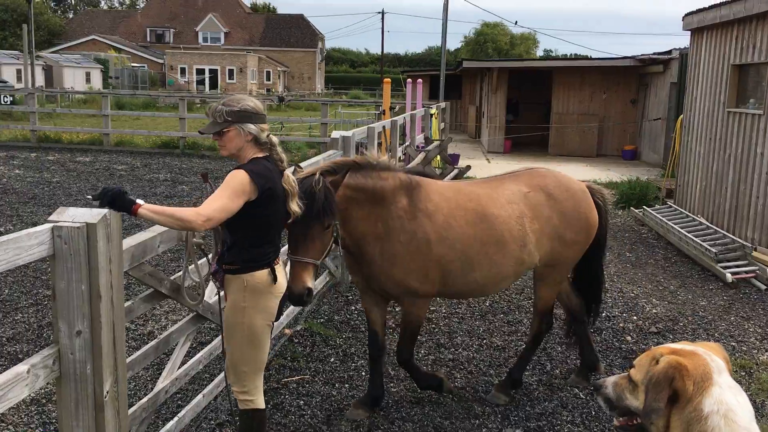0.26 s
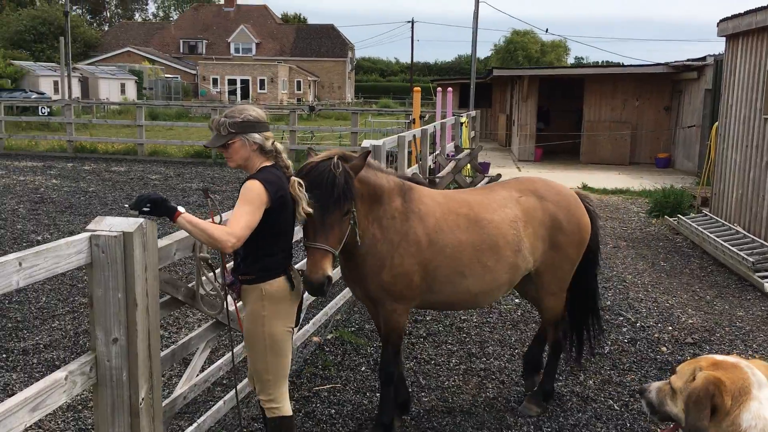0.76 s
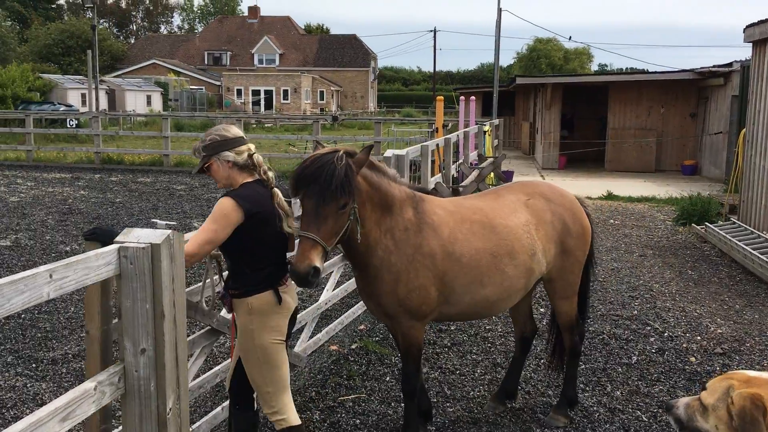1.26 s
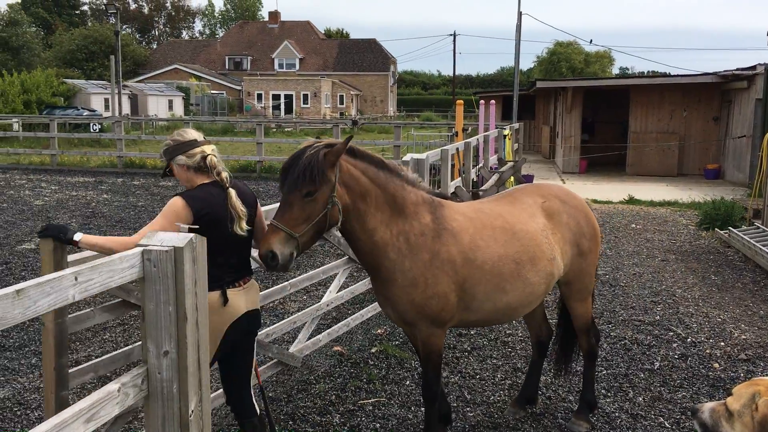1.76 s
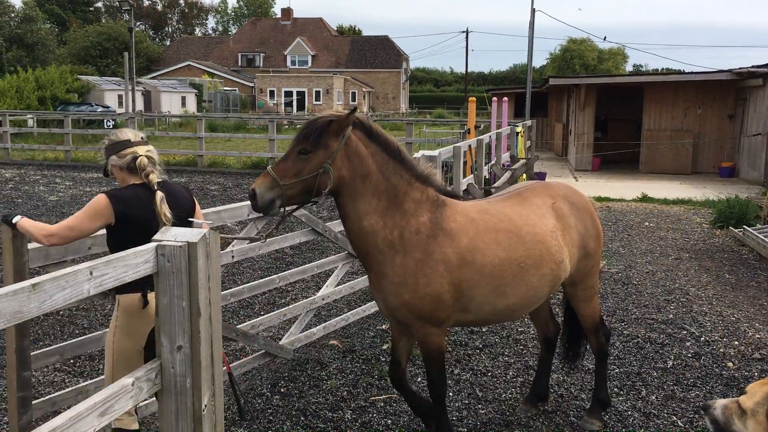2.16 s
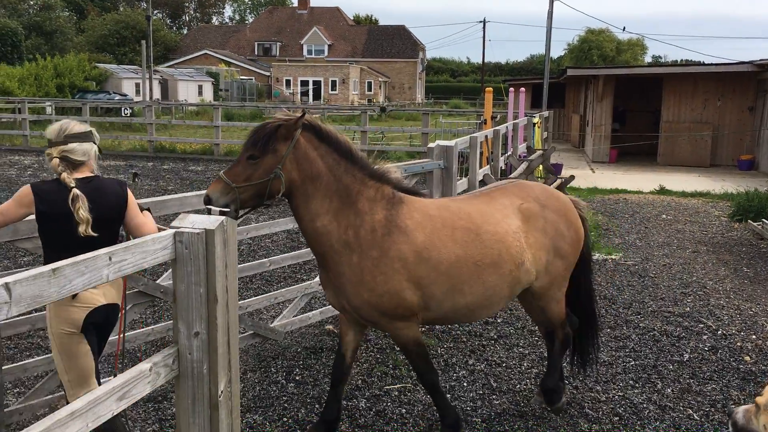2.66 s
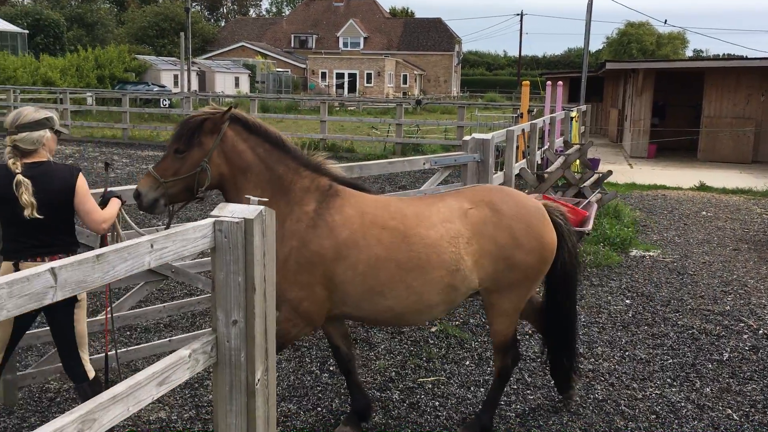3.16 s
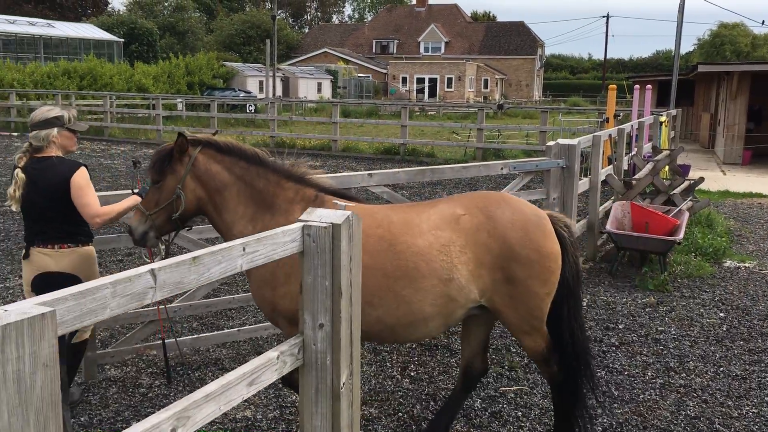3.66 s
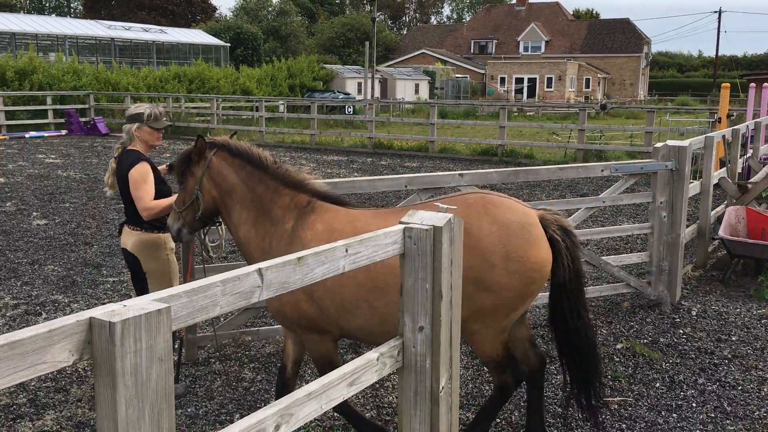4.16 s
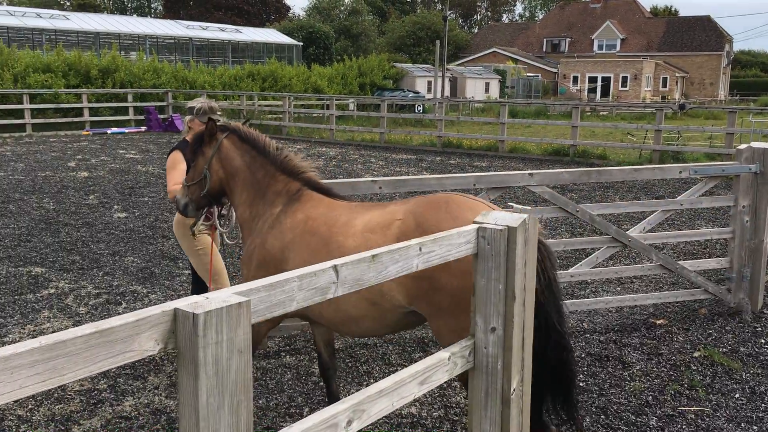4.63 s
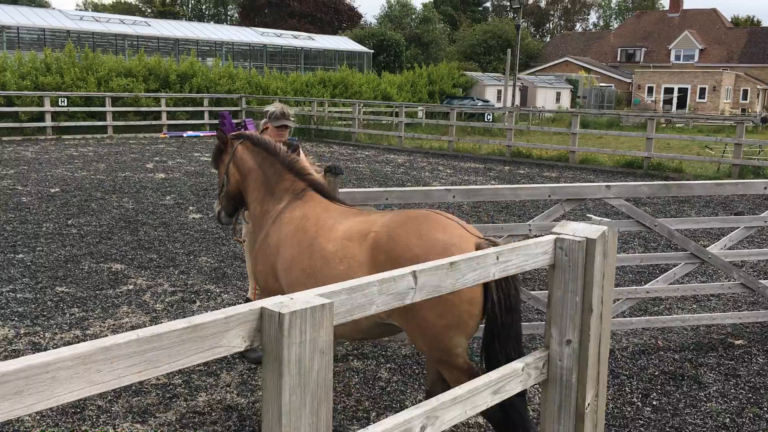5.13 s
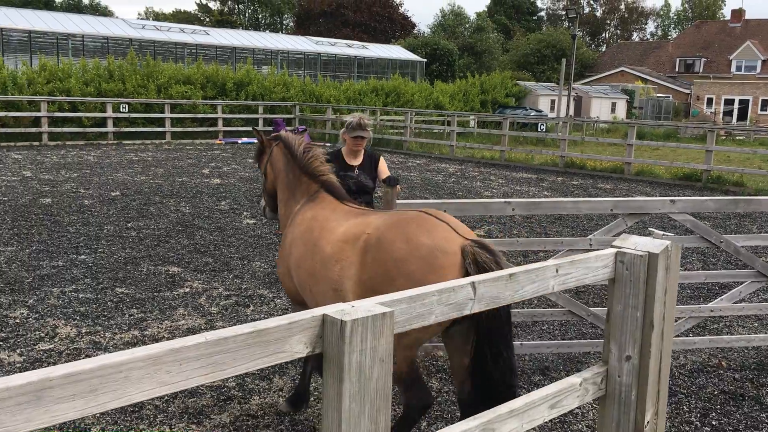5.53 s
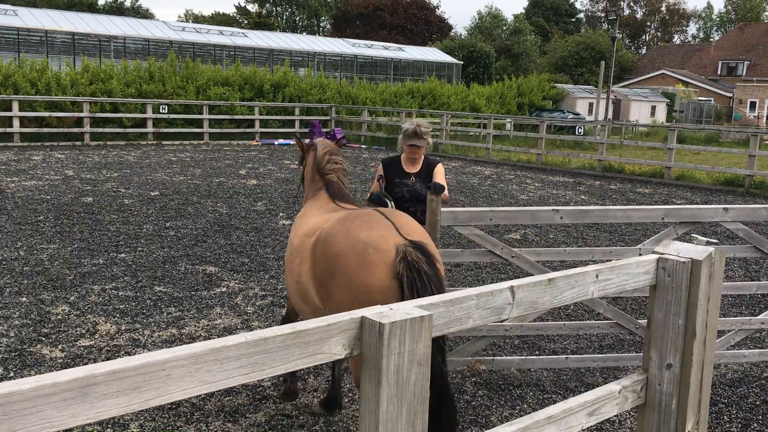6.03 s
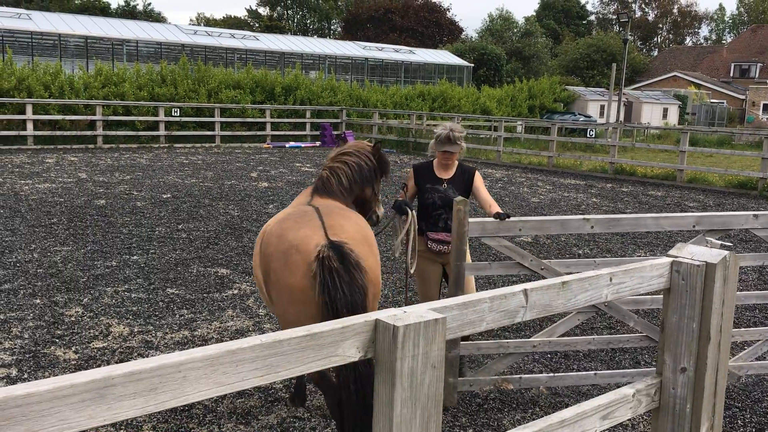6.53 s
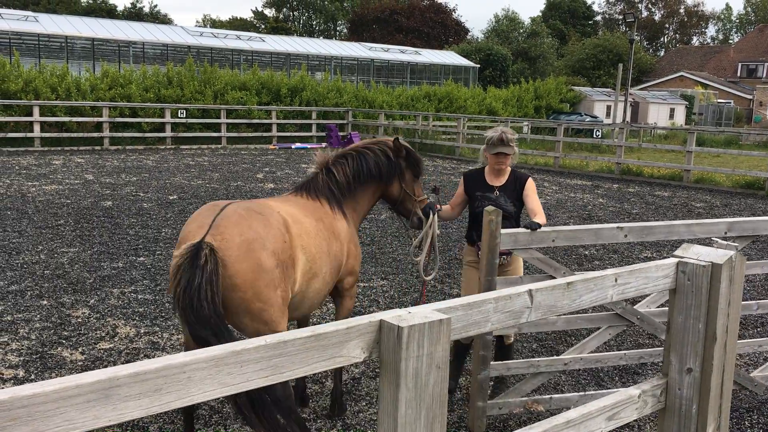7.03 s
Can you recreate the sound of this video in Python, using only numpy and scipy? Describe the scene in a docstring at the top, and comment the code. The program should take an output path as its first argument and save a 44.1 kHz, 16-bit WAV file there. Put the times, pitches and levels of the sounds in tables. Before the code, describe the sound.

A gate bolt squeals and clacks open, hooves crunch over gravel, then a horse whinnies high and drops to a low nicker outdoors.

```python
"""Over open-air hiss and a low rumble, a steel bolt knocks on a timber gate, squeals and clacks free.
A horse is led over gravel into an outdoor arena: stones crunch and snap, hooves clop, far birds call.
At 4 s it whinnies with two voices at once: a thin rising whistle over a low tone turns hoarse and
shakes. The call drops to a groan, then to a fluttering nicker with puffs through the nostrils.
A few more bird notes and faint steps close the scene."""
import sys
import numpy as np
from scipy import signal
from scipy.fft import rfft, irfft
from scipy.io import wavfile
from scipy.ndimage import uniform_filter1d

SR = 44100
rng = np.random.default_rng(int(sys.argv[2]) if len(sys.argv) > 2 else 0)


def store_wav(level_fs):
    """Save 16-bit WAV to argv[1]."""
    pcm = np.round(np.clip(np.atleast_2d(level_fs), -1, 1) * 32767)
    wavfile.write(sys.argv[1], SR, pcm.T.astype(np.int16))


N = 321489
TIME = np.arange(N) / SR
HIT_TIME = np.arange(SR // 2) / SR  # time axis of a one-shot

# tone of the open-air hiss: (frequency [Hz], gain [dB])
AIR_EQ = [(20, -24), (49, 5.5), (81, 1), (317, -15.5), (482, -24), (570, -20.5), (996, -22.5),
          (2060, -30.5), (3500, -30), (5100, -35.5), (10400, -35), (13400, -31.5), (15800, -38)]
# bands of far rumble: (frequency [Hz], width [Hz], rms level [dB])
RUMBLE_BANDS = [(74.94, 10, -59.5), (157, 70, -69)]
# hits of the bolt: (time [s], gate knock level [dB], steel level [dB], t60 [s])
BOLT_HITS = [(.242, -30, -35.5, 0.039), (.347, -44.5, -34, 0.18), (0.366, -38, -27, 0.042),
             (0.3849, -33.5, -26, 0.012), (0.3917, -16.5, -23, 0.036), (0.878, -45, -48.5, 0.11),
             (0.9436, -27, -26.5, 0.13), (0.966, -30, -30, 0.07), (0.977, -30.5, -39.5, 0.051),
             (1.046, -79, -50, 0.39)]
# short ring of the gate's timber: (frequency [Hz], gain [dB], t60 [s])
TIMBER_MODES = [(1010, -1, 0.043), (1199, 1.5, 0.034), (1434, -2.5, 0.037), (1570, -15.5, 0.074),
                (3038, -6, 0.025)]
# body of the gate: (frequency [Hz], gain [dB])
KNOCK_EQ = [(150, -26), (430, -26.5), (620, -11), (760, -9.5), (1050, -3), (1250, -6.5), (1550, -3),
            (1850, -17.5), (2350, -10), (2650, -19.5), (3000, -13), (4300, -26.5), (13000, -41.5)]
# bright steel contact: (frequency [Hz], gain [dB])
CLACK_EQ = [(1060, -31.5), (1800, -3), (4120, -2), (5000, -7.5), (5710, 1), (13700, -11.5), (15800, -3)]
# ring of bolt and gate: (frequency [Hz], gain [dB], t60 [s])
STEEL_MODES = [(1184, -20, 0.25), (2350, -18.5, 0.099), (3000, -18.5, 0.1), (4048, -23.5, 0.19),
               (5720, -5, 0.091), (5500, -21.5, 0.2), (6840, -19, 0.28), (8540, -14, 0.15), (9200, -19, .2),
               (10415, -17, 0.17), (11180, -16.5, 0.21), (12000, -9, 0.14), (13264, -10, 0.17),
               (13980, -15, .1)]
# squeaks of the sliding bolt: (time [s], length [s], level [dB])
BOLT_SQUEAKS = [(0.34, 0.025, -14.5), (0.357, 0.024, -14.5), (0.375, 0.025, -26), (0.443, 0.01, -32.5),
                (0.446, 0.041, -38.5)]
# tones that join the squeal under hard rubbing: (frequency [Hz], gain at full force [dB])
SQUEAL_SIDE_TONES = [(6870, -16), (11980, -19.5), (14300, -22)]
# the bolt sings on after the squeal: (frequency [Hz], level [dB], t60 [s])
SQUEAL_TAIL = [(7000, -55, 0.63), (13200, -41, .5)]
# the bolt scrapes in its keeper: (time [s], attack [s], level [dB])
BOLT_SCRAPES = [(0.591, 0.046, -46), (0.847, 0.0021, -51)]
# hooves and boots on gravel: (time [s], level [dB], extra grit [dB])
FOOTSTEPS = [(.63, -83, 6), (1.27, -69, 2), (2.64, -65.5, 0), (2.98, -66, 0), (3.12, -72, 5),
             (3.76, -64.5, 0.5), (6.85, -72, 1), (7.062, -66, 2)]
# body of the gravel: (frequency [Hz], gain [dB])
CRUNCH_EQ = [(180, -25.5), (300, 2.5), (370, -5), (1010, -1), (1330, -1.5), (2190, -0.5), (7000, -12.5),
             (9100, -38), (15400, -120)]
# top end of the gravel: (frequency [Hz], gain [dB])
GRIT_EQ = [(2350, -51), (4000, -13.5), (7840, -10.5), (11700, -6), (15800, -7)]
# soft thud of the ground: (frequency [Hz], width [Hz], gain [dB])
GROUND_MODES = [(203, 77, 0)]
# single stones snapping underfoot: (time [s], snap level [dB], body level [dB])
STONE_SNAPS = [(0.74, -31, -59), (0.7651, -27.5, -56), (0.781, -33, -62), (1.288, -43, -55.5),
               (1.434, -29.5, -61), (1.476, -35, -50),  (3.04, -39, -54), (3.062, -29, -66),
               (3.302, -34, -61), (3.478, -39, -70), (3.818, -48, -51.5), (3.959, -40, -50.5),
               (4.052, -39, -61), (6.592, -46, -54.5), (6.662, -40.5, -54.5)]
# hooves on larger stones: (time [s], pitch [Hz], level [dB])
HOOF_CLOPS = [(1.355, 1080, -48), (2.736, 1930, -43), (2.944, 2410, -49.5), (3.315, 1010, -47),
              (3.818, 916, -45), (5.766, 990, -47), (5.967, 1400, -44.5), (6.095, 1890, -53)]
# bird notes: (time [s], length [s], mid pitch [Hz], glide [Hz], arch [Hz], level [dB], scratch [x])
BIRD_NOTES = [(2.407, 0.037, 1447, 69, -1, -65, 0.25), (2.449, 0.031, 2050, -750, 44, -63, 0.34),
              (3.466, 0.135, 3090, 52, 424, -66.5, 0.44), (5.518, 0.067, 3853, 394, 0, -59.5, .5),
              (5.786, 0.048, 4390, -200, 66, -64.5, 0.34), (6.317, 0.093, 4440, 24, 6, -66.5, 0.25),
              (6.427, 0.072, 4520, 17, 7, -69.5, 0.34), (6.488, 0.041, 6350, -100, -700, -65, 0.25),
              (6.593, 0.036, 6400, 205, -450, -70, 0.24), (6.734, 0.068, 5640, -30, -1, -71, 0.17),
              (6.766, 0.19, 3710, 489, -60, -66, 0.89), (6.849, 0.21, 3830, 148.5, 9, -67.5, 3.6)]
# automation of the whinny: (time [s], whistle pitch [Hz], whistle level [dB], breath level [dB])
WHINNY_CURVES = [(4, 1380, -62, -51.5), (4.069, 1560, -47.5, -57.5), (4.225, 1673, -34.5, -54.5),
                 (4.259, 1783, -42.5, -55), (4.395, 1847, -36.5, -39), (4.426, 1955, -33.5, -41.5),
                 (4.474, 1917, -37, -38.5), (4.51, 1952, -30.5, -39), (4.59, 2048, -33, -39),
                 (4.734, 2002, -36, -39), (4.809, 1971, -45.5, -39.5), (4.929, 1979, -37.5, -41.5),
                 (4.985, 1913, -41.5, -45.5), (5.031, 1950, -36.5, -45), (5.09, 1898, -43.5, -44.5),
                 (5.22, 1856, -47.5, -46), (5.345, 1908, -52, -50), (5.4, 1930, -66, -50),
                 (5.561, 1800, -71, -61)]
# resonances that lift the whistle's octave: (frequency [Hz], width [Hz], gain [dB])
OCTAVE_FORMANTS = [(3122, 82, 9.5), (3570, 460, 1.5), (3818, 150, 2)]
# highest resonances of the open mouth: (frequency [Hz], width [Hz], gain [dB])
MOUTH_FORMANTS = [(5350, 500, -3), (6480, 480, -8), (7560, 500, -8), (8520, 270, -5), (9380, 850, -6.5),
                  (11600, 1500, -12), (13600, 2400, -18)]
# lower resonances of throat and nose: (frequency [Hz], width [Hz], gain [dB])
LOW_FORMANTS = [(610, 250, -4), (1123, 96, 6.5), (1407, 223, 5.5), (1787, 340, 5.5), (2153, 490, 5)]
# upper resonances of throat and nose: (frequency [Hz], width [Hz], gain [dB])
RASP_FORMANTS = [(2830, 380, 4), (3256, 160, 13), (3450, 180, 9.5), (3752, 140, 12.5), (4290, 170, 5.5),
                 (4650, 150, -1.5)]
# automation of the groan: (time [s], pitch [Hz], tone level [dB], rasp level [dB])
GROAN_CURVES = [(5.262, 215.7, -56, -60), (5.28, 204.3, -34, -48), (5.328, 279.2, -42, -38),
                (5.356, 225, -37.5, -42.5), (5.39, 176.7, -37, -52.5), (5.425, 166, -30.5, -58),
                (5.475, 158.4, -40, -60), (5.51, 154.3, -36, -60), (5.54, 127, -52, -73)]
# the throat during the groan: (frequency [Hz], width [Hz], gain [dB])
GROAN_FORMANTS = [(497, 270, -2.5), (1368, 145, 6.5), (1626, 110, 6.5), (1920, 120, 5.5), (2130, 130, 4),
                  (3290, 280, -0.5)]
# flutters of the nicker: (time [s], level [dB], pitch [Hz], length [s])
NICKER_FLUTTERS = [(5.538, -44.5, 100, 0.081), (5.609, -35, 64, 0.0412), (5.705, -39, 65.5, 0.041),
                   (5.826, -44.5, 134, 0.041), (5.892, -36, 158, 0.0068), (5.893, -34, 61.6, 0.047),
                   (5.949, -42, 79.3, 0.055), (6.013, -45, 68, 0.07)]
# puffs through the nostrils: (time [s], attack [s], level [dB])
NOSTRIL_PUFFS = [(5.54, 0.08, -68.5), (5.812, 0.042, -59.5), (5.893, 0.034, -60), (6.051, 0.11, -76)]
# nostril resonances: (frequency [Hz], width [Hz], gain [dB])
NOSTRIL_FORMANTS = [(1500, 450, 2), (1990, 210, 0.5), (3335, 220, 5), (3910, 490, -7.5), (5700, 770, -11.5)]
# reverb decay of the yard: (frequency [Hz], t60 [s])
YARD_DECAY = [(150, 0.21), (1000, 0.42), (4000, 0.36), (14000, 0.14)]

HIT_ATTACK_S = 0.0031
WHINNY_S, GROAN_S = WHINNY_CURVES[0][0], GROAN_CURVES[0][0]
HISS_DULL_DB = -3  # the closing mouth takes this off the top end


def amp(db):
    """Decibels to gain."""
    return 10 ** (np.asarray(db) / 20)


def unit(x):
    """Scales to an rms of 1."""
    return x / np.sqrt(np.mean(x ** 2) + 1e-20)


def ramp(start, length):
    """Fades from 0 at start to 1 at start + length; a negative length runs back in time."""
    return np.clip((TIME - start) / length, 0, 1)


def decay(t60):
    """One-shot envelope that falls 60 dB in t60 seconds."""
    return amp(-60 * HIT_TIME / t60)


def value_at(points, hz):
    """Reads a curve on a log-frequency axis."""
    f, value = np.transpose(points)
    return np.interp(np.log(hz + 1), np.log(f + 1), value)


def curves(rows):
    """Turns timed breakpoints into one automation curve per column."""
    times, *columns = np.transpose(rows)
    return [np.interp(TIME, times, column) for column in columns]


def during(rows):
    """1 while a table lasts, with soft ends."""
    return uniform_filter1d(1. * (TIME >= rows[0][0]) * (TIME <= rows[-1][0]), size=600)


def add(mix, s, sound):
    """Mixes a sound in at time s."""
    part = mix[max(round(s * SR), 0):][:len(sound)]
    part += sound[:len(part)]


def phase_of(hz):
    """Running phase of a pitch curve."""
    return 2 * np.pi * np.cumsum(hz) / SR


def wander(hz):
    """Smooth random modulation of rms 1, up to the given rate."""
    f = np.fft.rfftfreq(N, 1 / SR)
    return unit(irfft(rfft(rng.standard_normal(N)) / (1 + (f / hz) ** 4), N))


def colour(x, eq):
    """Minimum-phase EQ."""
    hz = abs(np.fft.fftfreq(2048, 1 / SR))
    log_gain = np.log(amp(np.maximum(value_at(eq, hz), -100)))
    taps = np.fft.ifft(np.exp(np.conj(signal.hilbert(log_gain)))).real
    return signal.oaconvolve(x, taps)[:len(x)]


def resonate(x, modes, shift=1):
    """Parallel resonances, each applied twice for dark valleys; shift scales their pitch."""
    out, clock = np.zeros(N), phase_of(shift * np.ones(N))
    for hz, width, db in modes:
        pole, carrier = np.exp(-np.pi * width / SR), np.exp(1j * hz * clock)
        band = signal.lfilter([(1 - pole) ** 2], np.poly([pole, pole]), x * carrier.conj() + 1e-18)
        out += amp(db) * (carrier * band).real
    return out


def ringing(modes):
    """A struck object: each mode starts at a random phase and dies away."""
    sound = sum(amp(db) * decay(t60) * np.sin(2 * np.pi * (hz * HIT_TIME + rng.random()))
                for hz, db, t60 in modes)
    return sound * np.minimum(HIT_TIME / .0005, 1)


def burst(attack, t60, eq):
    """A rattling contact: coloured noise that swells to rms 1 and dies."""
    shape = np.minimum(HIT_TIME / attack, 1) * amp(-60 * np.maximum(HIT_TIME - attack, 0) / t60)
    sound = colour(rng.standard_normal(len(shape)) * shape, eq)
    return unit(sound) * np.sqrt(np.mean(shape ** 2))


def outdoors(hiss_db=-57):
    """The bed: soft, drifting open-air hiss over a distant rumble."""
    air_gain = amp(value_at(AIR_EQ, np.fft.rfftfreq(N, 1 / SR)))
    hiss = unit(irfft(rfft(rng.standard_normal(N)) * air_gain, N))
    rumble = sum(amp(db) * unit(resonate(rng.standard_normal(N), [(hz, width, 0)]))
                 for hz, width, db in RUMBLE_BANDS)
    return hiss * amp(hiss_db + 1.1 * wander(1)) + rumble


def timber_knock(peak_db=2):
    """The struck timber of the gate rings briefly."""
    knock = sum(amp(db) * decay(t60) * np.sin(2 * np.pi * hz * HIT_TIME) for hz, db, t60 in TIMBER_MODES)
    knock *= np.minimum(HIT_TIME / HIT_ATTACK_S, 1)
    return knock * amp(peak_db) / abs(knock).max()


def bolt_hits(crack_db=-3, clack_db=-4, rattle_db=-37, held_db=-13.5):
    """The bolt knocks on the timber, clacks, sets the steel ringing and rattles the loose gate."""
    hits, ring, rattle = np.zeros((3, N))
    timber = timber_knock()
    for s, knock_db, steel_db, t60 in BOLT_HITS:
        add(hits, s, amp(knock_db) * (timber + amp(crack_db) * burst(HIT_ATTACK_S, t60, KNOCK_EQ)))
        add(hits, s, amp(steel_db + clack_db) * burst(HIT_ATTACK_S, t60, CLACK_EQ))
        add(ring, s, amp(steel_db) * ringing(STEEL_MODES))
        shiver = sum(burst(attack=0.023, t60=0.51, eq=eq) for eq in (CLACK_EQ, KNOCK_EQ))
        add(rattle, s, amp(knock_db + rattle_db) * shiver)
    rattle *= amp(6.5 * wander(64))  # the gate shivers in fits
    ring *= amp(held_db * (1 - ramp(0.82, 0.14)))  # the keeper damps the steel until the bolt is free
    ring *= amp(4.5 * wander(110))  # loose parts touch and unsettle the ring
    return hits + ring + rattle


def bolt_squeal(pitch_hz=13270, waver=0.0027, side_waver=0.019):
    """Sliding steel squeals, gains side tones as it rubs harder, and sings on afterwards."""
    rub = np.zeros(N)
    for s, length, db in BOLT_SQUEAKS:
        add(rub, s, amp(db) * np.sin(np.linspace(0, np.pi, int(length * SR))))
    slip = phase_of(1 + waver * wander(180))
    judder = phase_of(1 + side_waver * wander(376))
    sides = sum(amp(db) * np.sin(hz * judder) for hz, db in SQUEAL_SIDE_TONES)
    squeal = rub * (np.sin(pitch_hz * slip) + rub / rub.max() * sides)
    for hz, db, t60 in SQUEAL_TAIL:
        phase = 2 * np.pi * hz * HIT_TIME + wander(40)[:len(HIT_TIME)]
        add(squeal, BOLT_SQUEAKS[1][0], amp(db) * decay(t60) * np.sin(phase))
    return squeal


def bolt_scrapes(t60=0.053, steel_db=-11):
    """The bolt grinds in its keeper and shakes the timber, with a steel edge on top."""
    out, timber = np.zeros(N), timber_knock()
    for s, attack, db in BOLT_SCRAPES:
        grind = amp(db) * burst(attack, t60, KNOCK_EQ)
        shiver = unit(signal.oaconvolve(grind, timber)[:len(grind)]) * np.std(grind)
        add(out, s, (grind + shiver) / np.sqrt(2))
        add(out, s, amp(db + steel_db) * burst(attack, t60, CLACK_EQ))
    return out


def grains(per_s, spread_db):
    """Sparse clicks of very uneven size."""
    size = amp(spread_db * np.minimum(rng.exponential(1, N), 4))
    return size * rng.choice([-1, 1], N) * (rng.random(N) < per_s / SR)


def gravel_steps(step_s=0.33, shuffle_db=-70.5, leaving_db=-16, grit_db=1.5, thud_db=-1):
    """Stones grind in clumps and the ground thuds as the weight of each step rolls on and off."""
    crunch = unit(colour(grains(1300, 2.2), CRUNCH_EQ) * amp(2.2 * wander(25.6)))
    grit = unit(colour(grains(2700, 4.2), GRIT_EQ) * amp(6.3 * np.tanh(wander(22))))
    thud = unit(resonate(rng.standard_normal(N), GROUND_MODES))
    tread = sum(amp(db) * np.sin(np.pi * ramp(s, step_s)) for s, db, _ in FOOTSTEPS)
    scuff = sum(amp(db + extra_db) * np.sin(np.pi * ramp(s, step_s)) for s, db, extra_db in FOOTSTEPS)
    distance = amp(leaving_db * ramp(5.63, 0.33))  # horse and handler walk off
    shuffle = amp(shuffle_db) * distance  # stones keep shifting between steps
    out = np.hypot(tread, shuffle) * crunch + amp(grit_db) * np.hypot(scuff, shuffle) * grit
    return out + amp(thud_db) * tread * distance * thud


def stone_snaps(grind_s=0.016):
    """A stone grinds briefly underfoot, then snaps: a bright tick over a duller body."""
    out = np.zeros(N)
    for s, snap_db, body_db in STONE_SNAPS:
        add(out, s - grind_s, amp(snap_db - 25) * burst(grind_s, 0.052, GRIT_EQ))
        add(out, s, amp(snap_db - 11) * burst(0.00044, 0.023, GRIT_EQ))
        add(out, s, amp(body_db + 2) * burst(0.00024, 0.041, CRUNCH_EQ))
    return out


def hoof_clops(t60=0.013, crunch_db=-11):
    """A hoof knocks on a larger stone: one short tone with a touch of crunch."""
    out = np.zeros(N)
    for s, hz, db in HOOF_CLOPS:
        clop = ringing([(hz, 0, t60)]) + amp(crunch_db) * burst(0.0005, t60, CRUNCH_EQ)
        add(out, s, amp(db) * clop)
    return out


def birds(warble=0.021):
    """Thin whistles that glide and bend; fast pitch jitter makes some scratchy."""
    out, jitter = np.zeros(N), warble * wander(275)
    for s, length, pitch_hz, glide_hz, arch_hz, db, scratch in BIRD_NOTES:
        progress = np.linspace(0, 1, int(length * SR))
        hz = pitch_hz + glide_hz * (progress - .5) - arch_hz * (2 * progress - 1) ** 2
        hz *= 1 + scratch * jitter[int(s * SR):][:len(hz)]
        add(out, s, amp(db) * np.sin(phase_of(hz)) * np.sin(np.pi * progress))
    return out * amp(2 * wander(40))


def whistle(high, low, broken, closed, mouth, rough, side_db=-16, shimmer_db=6, flutter=0.8):
    """The high voice: its octave rings the throat, its overtones flare in the mouth's resonances."""
    tone = np.sin(high) * amp(shimmer_db * broken * np.tanh(wander(59.95)))  # falters once broken
    octave = amp(-5 + broken) * resonate(np.sin(2 * high), OCTAVE_FORMANTS)
    # the low voice chops the overtones and, until the break, puts side tones around the whistle
    overtones = sum(np.sin(k * high) for k in range(3, 9)) * (1 + np.cos(low))
    upper = amp(-17 + HISS_DULL_DB * closed) * resonate(overtones, MOUTH_FORMANTS, mouth)
    sides = np.sin(high + 2 * low) + .5 * np.sin(high + low) + 0.38 * np.sin(high - low)
    sides *= amp(side_db) * (1 - broken)
    return np.sqrt(2) * (tone + octave + upper + sides) * (1 + flutter * rough * np.tanh(wander(163)))


def vocal_folds(low, pulses, broken, mouth, chest=0.71, base_db=-56, swell_db=7.5, lumpy_db=3):
    """The low voice: pulses ring the throat over a chest tone that moves up an octave at the break."""
    drive = pulses * during(WHINNY_CURVES)
    voice = unit(resonate(drive, LOW_FORMANTS, mouth)) * np.std(drive)
    voice += chest * ((1 - broken) * np.cos(low) + broken * np.cos(2 * low)) * amp(2 * wander(60))
    voice *= amp(base_db + swell_db * ramp(4.83, 0.21) + lumpy_db * broken * wander(40))
    return voice * ramp(WHINNY_S, 0.125) * (1 - ramp(GROAN_S, 0.14))  # hands over to the groan


def breath(pulses, broken, closed, mouth, rough, buzz=0.42, rasp_dull_db=-6.5, tight_hiss_db=5):
    """Air leaves in uneven puffs, buzzes with the folds and rings the throat and mouth."""
    stream = rng.standard_normal(N) * (1 + rough) + buzz * pulses
    puffs = stream * amp(1.5 * wander(130))
    hoarse = unit(resonate(puffs, LOW_FORMANTS, mouth)) * amp(-2)
    rasp = unit(resonate(puffs, RASP_FORMANTS, mouth)) * amp(rasp_dull_db * closed)
    hiss = unit(resonate(stream, MOUTH_FORMANTS, mouth * (1 + .014 * wander(14))))
    return hoarse + rasp + hiss * amp(-15 + HISS_DULL_DB * closed + tight_hiss_db * (1 - broken))


def nasal(x, notch_hz=2520, width_hz=515):
    """The nasal passage swallows one band."""
    return signal.lfilter(*signal.iirnotch(notch_hz, notch_hz / width_hz, SR), x)


def whinny(crest_s=4.45, crest_hz=336.6, break_s=4.3, break_length_s=0.283, shake_hz=10.05):
    """Two voices and rushing air start clean, break, shake, and turn nasal as the mouth closes."""
    high_hz, whistle_db, breath_db = curves(WHINNY_CURVES)
    # the low voice climbs to a crest, then sags (slopes in Hz/s)
    low_hz = crest_hz - np.maximum(170 * (crest_s - TIME), 135 * (TIME - crest_s))
    broken, closed = ramp(break_s, break_length_s), ramp(4.68, 0.32)
    # formants rise as the mouth opens and sink a little as it closes
    mouth = 1 - 0.11 * ramp(crest_s, WHINNY_S - crest_s) - 0.027 * closed
    hoarseness = .45 + .5 * (TIME - break_s - break_length_s)
    rough = 0.1317 * (1 - broken) + hoarseness * broken
    # the vibrato sets in fast, dwells at its two ends, is never quite even, and dies away
    depth_hz = 123.4 * ramp(4.505, 0.02403) * ramp(5.2, -0.18)
    swing = np.cos(2 * np.pi * shake_hz * (TIME - 4.536) + .2 * wander(8))
    bend_hz = depth_hz * np.tanh(1.3 * swing + .28 * wander(45))
    low = phase_of(low_hz * (1 + bend_hz / high_hz + .08 * rough * wander(110.1)))
    high = phase_of((high_hz + bend_hz) * (1 + .018 * rough * wander(284)))
    pulses = unit(sum(np.cos(k * low) for k in range(1, 46)))
    voice = amp(whistle_db) * whistle(high, low, broken, closed, mouth, rough)
    voice += vocal_folds(low, pulses, broken, mouth)
    voice += amp(breath_db) * breath(pulses, broken, closed, mouth, rough)
    voice *= during(WHINNY_CURVES)
    return voice + closed * (nasal(voice) - voice)


def groan(split_s=5.37, sub_gain=0.32, unsteady_db=3.5, chop_hz=42.25, chop_depth=0.41):
    """The voice falls, a tone at half its pitch joins in, and the slack nostrils chop it."""
    hz, tone_db, rasp_db = curves(GROAN_CURVES)
    split = ramp(split_s, 0.03)
    phase = phase_of(hz * (1 + (0.03 + 0.046 * split) * wander(90.8)))
    sub = np.sin(phase / 2) + 0.42 * np.sin(3 * phase / 2)
    tone = np.sin(phase) + amp(-21) * np.sin(2 * phase) + sub_gain * split * sub
    chop = 1 + chop_depth * ramp(split_s, .1) * np.cos(phase_of(chop_hz * (1 + .12 * wander(30))))
    # each cycle lets out a pulse and a puff of air, which rasp in the throat
    pulses = unit(sum(np.cos(k * phase) for k in range(2, 15)))
    puffs = rng.standard_normal(N) * (1 + 0.64 * np.cos(phase))
    rasp = unit(nasal(resonate(pulses + puffs, GROAN_FORMANTS))) * amp(rasp_db)
    tone *= amp(tone_db + unsteady_db * split * wander(83))
    return (tone + rasp) * chop * during(GROAN_CURVES)


def nicker(rolloff=0.59):
    """The voice breaks into slack, low flutters, each only a few cycles long."""
    out = np.zeros(N)
    for s, db, hz, length in NICKER_FLUTTERS:
        t = np.arange(int(length * SR)) / SR
        phase = 2 * np.pi * hz * (t - length / 2)
        flaps = sum(rolloff ** (k - 1) / k * np.cos(k * phase) for k in range(1, 5))
        add(out, s, -amp(db) * flaps * np.sin(np.pi * t / length))
    return out


def snort(flap_hz=54, flap_db=4.5):
    """The nostrils flap unevenly and cut each puff of air into spurts."""
    flap = np.cos(phase_of(flap_hz * (1 + .45 * wander(45))))
    spurts = amp(flap_db * (flap + .5 * wander(40)))
    air = unit(nasal(resonate(rng.standard_normal(N) * spurts, NOSTRIL_FORMANTS)))
    out = np.zeros(N)
    for s, attack, db in NOSTRIL_PUFFS:
        age = np.maximum(TIME - s, 0) / attack
        out += amp(db) * air * age * np.exp(1 - age)
    return out


def yard_reverb(send, echoes_per_s=2000, predelay_s=.008):
    """Short scatter from fences and sheds."""
    taps = rng.standard_normal(SR) * (rng.random(SR) < echoes_per_s / SR)
    taps *= np.arange(SR) > predelay_s * SR
    hz, t, bands = signal.stft(taps, SR, nperseg=256)
    bands *= amp(-60 * t / value_at(YARD_DECAY, hz)[:, None])
    tail = signal.istft(bands, SR, nperseg=256)[1]
    return signal.oaconvolve(send, tail / np.linalg.norm(tail))[:N]


def scene():
    """The mono mix: the gate close and dry, the horse farther off, the birds distant and wettest."""
    bed = outdoors()
    gate = bolt_hits() + bolt_squeal() + bolt_scrapes()
    steps = gravel_steps() + stone_snaps() + hoof_clops()
    song = birds()
    horse = whinny() + groan() + nicker() + snort()
    send = amp(-28.5) * gate + amp(-13) * steps + amp(-6) * song + amp(-12) * horse
    return (bed + gate + steps + song + horse + yard_reverb(send))[None]


def record(dry):
    """A steep high cut at 15.9 kHz on the whole mix."""
    high_cut = signal.firwin(511, 15900, window=("kaiser", 9), fs=SR)
    return signal.oaconvolve(dry, high_cut[None], "same")


dry = scene()
out = record(dry)
store_wav(out)
```